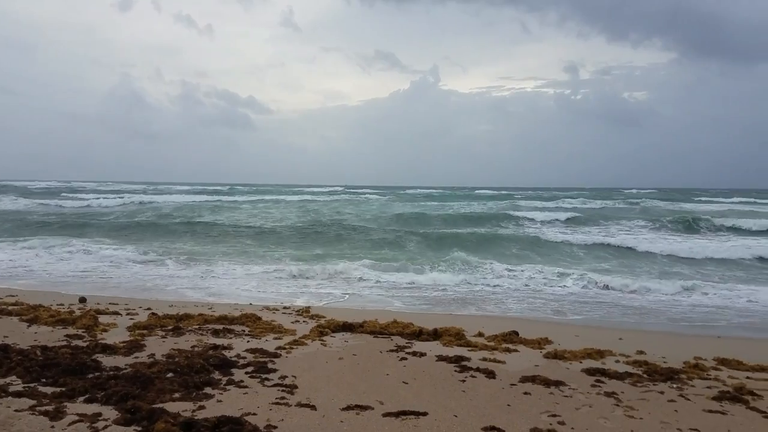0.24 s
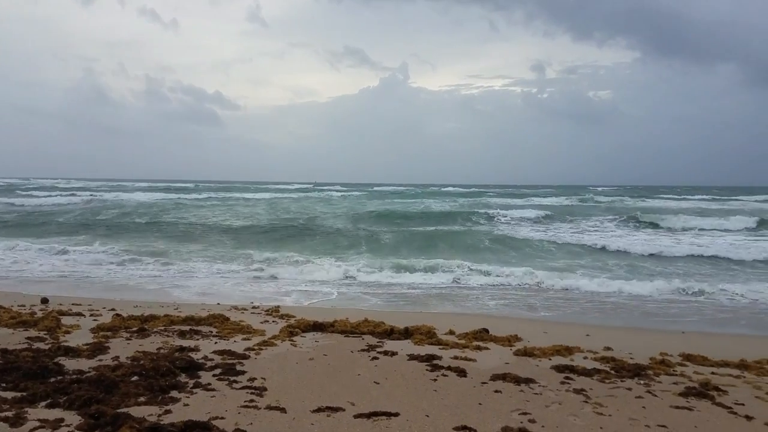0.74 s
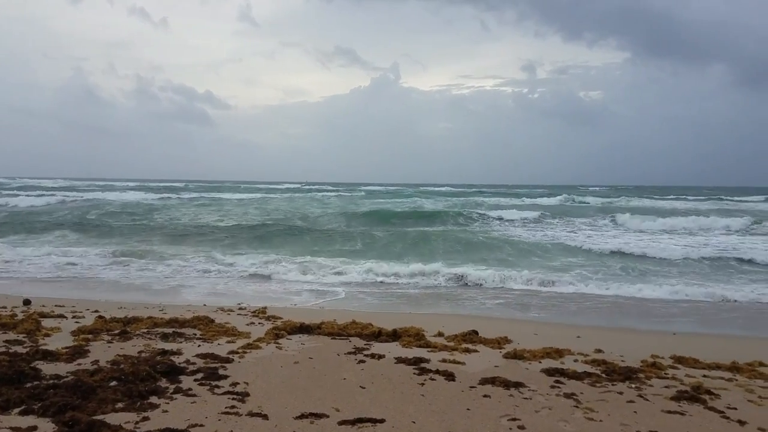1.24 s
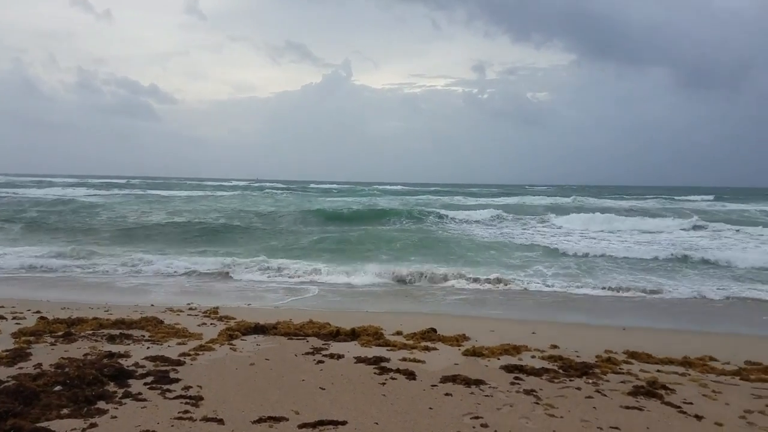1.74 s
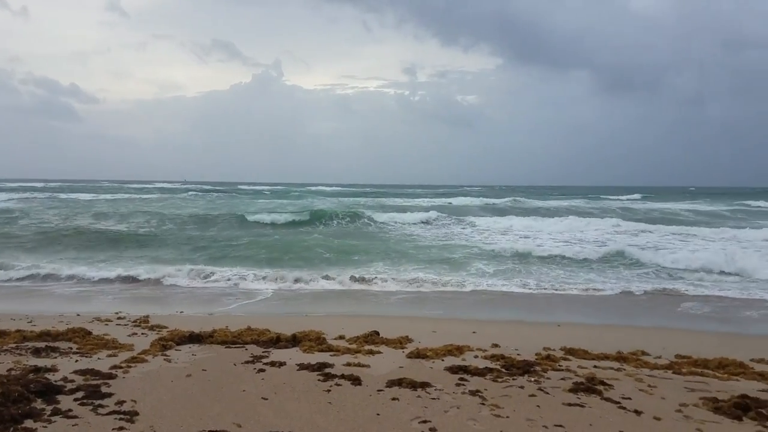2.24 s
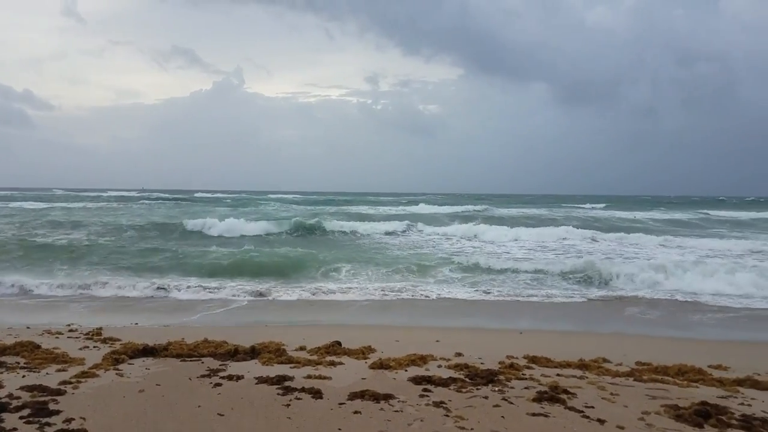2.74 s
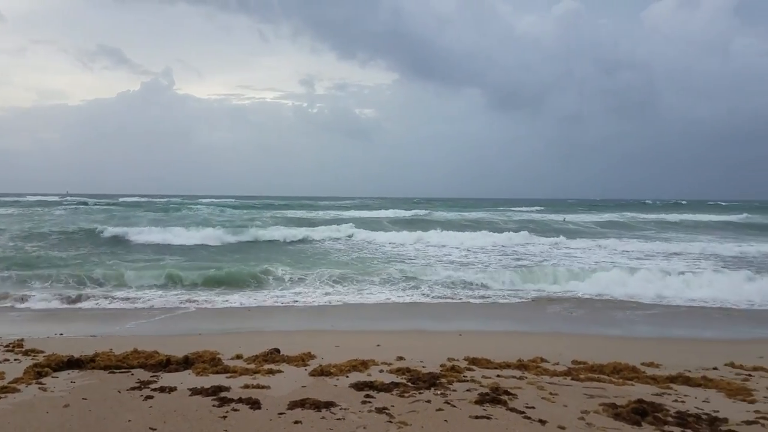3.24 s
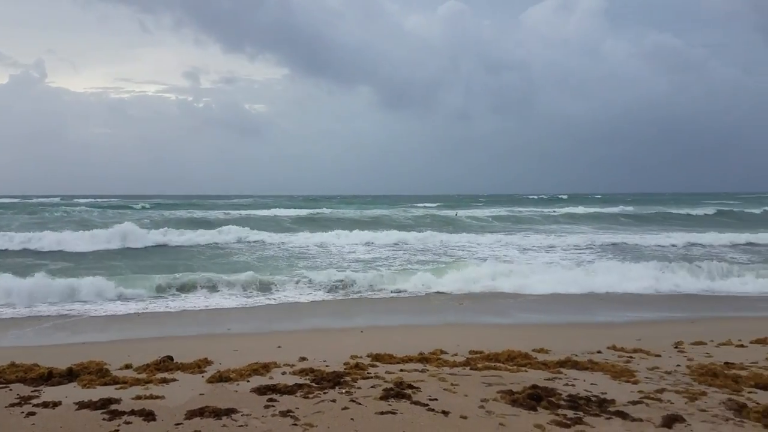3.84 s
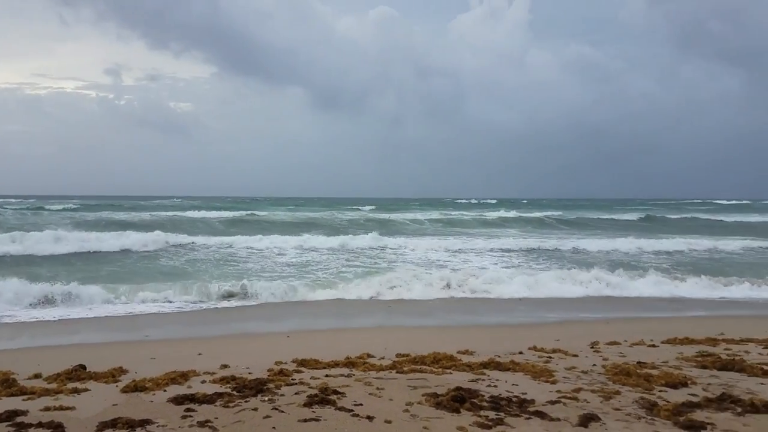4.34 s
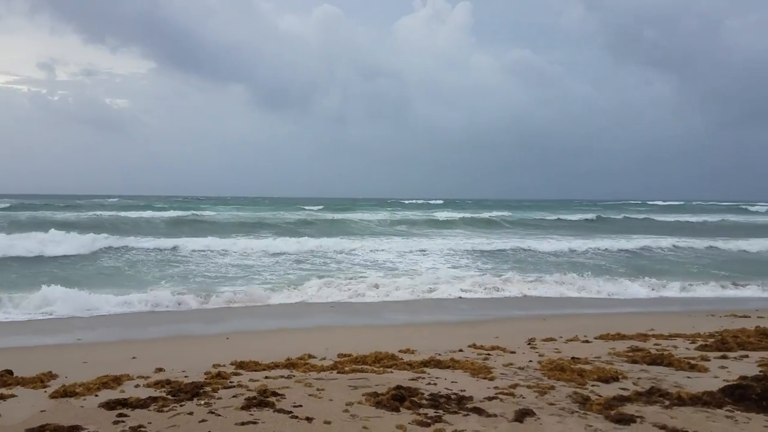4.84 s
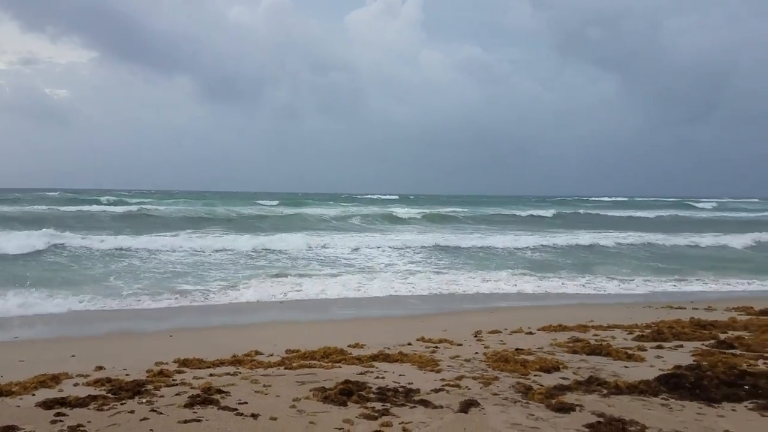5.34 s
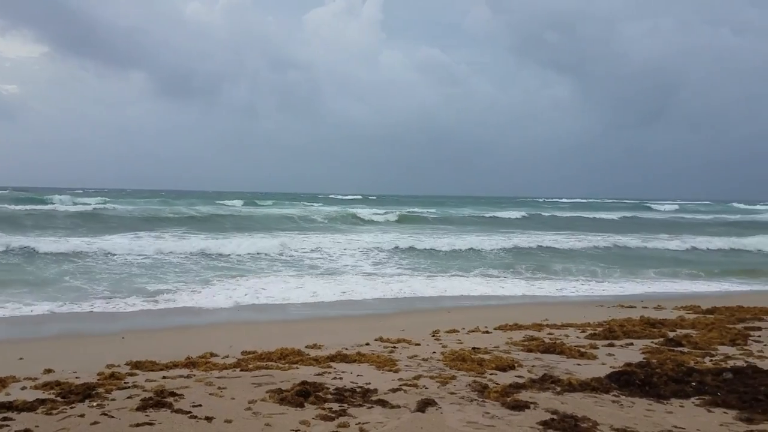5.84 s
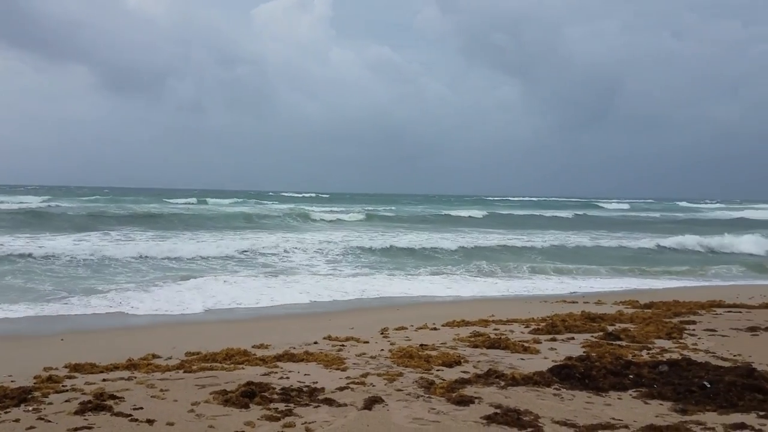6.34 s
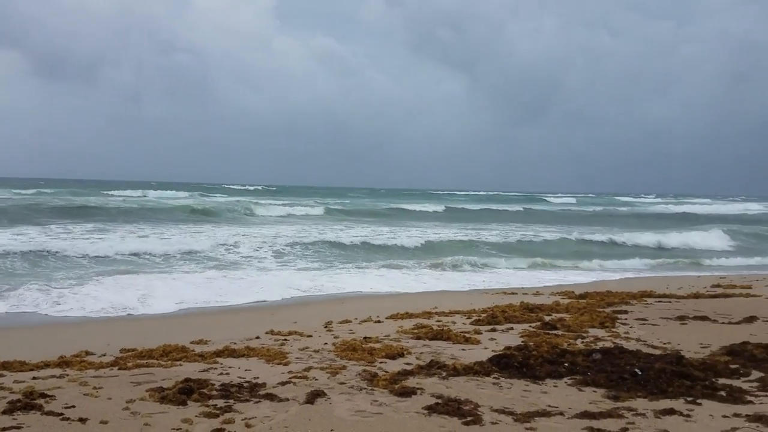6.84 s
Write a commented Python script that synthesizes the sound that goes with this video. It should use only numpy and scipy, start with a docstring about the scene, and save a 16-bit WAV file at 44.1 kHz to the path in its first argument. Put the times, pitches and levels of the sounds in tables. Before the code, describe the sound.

Outdoors on a windy beach, storm air beats directly on a hand-held stereo microphone. From 0 to 2 s a rough, continuous roar fills the right side while the left carries softer, lumpy rumble with gust thumps near 0.1, 0.9 and 1.2 s; thin surf hiss drifts underneath. From 2 s faint tones stutter in the left, with another gust around 2.3 s. From 3.1 s short high chirping whistles appear at left, jumping in pitch; a wavering high whistle holds from about 3.8 to 4.4 s, then a lower, stronger one until 5.2 s. The wind becomes hollow from 5.1 s and sinks on the right near 5.5 to 5.9 s. Lower, breathy whistles sound on both sides from 5.7 to 6.2 s, in broken bursts. Surf hiss has swelled by 6.2 s; buffeting surges around 6.4 s, and hard rapid slaps crowd the left from 6.5 to 6.8 s, with the right choppy until the end at 7 s.

```python
"""Storm wind on a beach buffets the two microphone ports of a hand-held camera: noise, shaped at each port.
Foam hisses beneath it throughout as drifting noise. From 2 s the left port stutters between two tones,
and from 3.1 to 6.2 s the air jet across its hole whistles, as wobbling sines that jump between stages.
From 5.1 s the wind turns hollow; from 5.7 s the right port whistles breathily, as a band of noise.
At 6.2 s the surf has swelled, and from 6.5 s hard slaps of air crowd the left port."""
import sys
import numpy as np
from scipy import signal
from scipy.io import wavfile
from scipy.ndimage import uniform_filter1d

SR = 44100
rng = np.random.default_rng(int(sys.argv[2]) if len(sys.argv) > 2 else 0)


def generate_wav(sig):
    """Save sig (samples, or channels by samples) to the path in sys.argv[1] as 16-bit PCM at SR."""
    pcm = np.round(np.clip(np.atleast_2d(sig).T, -1, 1) * 32767).astype(np.int16)
    wavfile.write(sys.argv[1], SR, pcm)


N = 312669
FRAME, HOP = 512, 128  # short-time spectrum, samples


def gain_of(db):
    """Level law: 20 dB is a factor of ten in pressure."""
    return 10 ** (np.asarray(db) / 20)


def evened(x):
    """Normalisation to an rms of 1."""
    return x / np.sqrt(np.mean(x ** 2) + 1e-20)


def read(points, hz):
    """Spectrum in dB, interpolated along logarithmic frequency."""
    point_hz, value = np.transpose(points)
    return np.interp(np.log(hz + 1), np.log(point_hz + 1), value)


def lobe(hz, centre_hz):
    """Flat-topped band weight, symmetric in logarithmic frequency."""
    return 1 / (1 + (np.log(hz / centre_hz + 1e-9) / .5) ** 4)


def pulses(rows, width_s):
    """Gaussian pulses summed in dB, each down to 1/e of its peak at width_s either side."""
    clock = np.arange(N) / SR
    return np.zeros(N) + sum(db * np.exp(-((clock - at) / width_s) ** 2) for at, db in rows)


def add(mix, s, sound):
    """Superposition: pressures add from s seconds on."""
    part = mix[round(s * SR):][:len(sound)]
    part += sound[:len(part)]


def wander(length, hz):
    """Low-passed random fluctuation of rms 1, with a double pole at hz."""
    pole = np.exp(-2 * np.pi * hz / SR)
    noise = rng.standard_normal(length)
    return evened(signal.lfilter([1], np.poly([pole, pole]), noise))


def shaped(x, field_db):
    """Time-varying filtering: a level field over (s, Hz) weights the short-time spectrum."""
    hz, t, spectrum = signal.stft(x, SR, nperseg=FRAME, noverlap=FRAME - HOP)
    spectrum = spectrum * gain_of(field_db(t[None], hz[:, None]))
    return signal.istft(spectrum, SR, nperseg=FRAME, noverlap=FRAME - HOP)[1][:N]


# Buffeting of each port above the rumble. Each row: time in seconds, level in dB.
LEFT_BUFFETING = [(0.0, -26.5), (0.5, -21), (0.75, -26), (1.12, -25.5), (1.33, -30.5), (1.56, -24.5),
                  (1.9, -28), (2.55, -27), (2.85, -28.5), (3.5, -28.5), (3.6, -34), (3.83, -37),
                  (3.92, -31.5), (4.26, -28.5), (4.87, -34), (5.23, -30), (5.8, -35), (5.94, -25.5),
                  (6.26, -23), (6.39, -18.5), (7.08, -23)]
RIGHT_BUFFETING = [(0.0, -13.5), (0.13, -11), (.5, -11), (0.76, -8.5), (0.95, -16.5), (1.05, -12),
                   (1.33, -11), (1.7, -13.5), (2.13, -11), (2.73, -11), (2.87, -14), (3.15, -11.5),
                   (5.27, -12.5), (5.5, -22), (5.7, -24.5), (5.83, -30), (5.94, -18), (6.13, -18.5),
                   (6.38, -9), (6.59, -11.5), (6.695, -18.5), (6.73, -11.5), (6.775, -22), (6.81, -12.5),
                   (6.91, -20), (7.08, -18.5)]
# Relative eddy pressure spectrum at air speed 1. Each row: frequency in Hz, density in dB.
LEFT_EDDY_SPECTRUM = [(120, -3), (250, -4), (700, -15), (1000, -26), (2000, -32.5), (4000, -64),
                      (8000, -86)]
RIGHT_EDDY_SPECTRUM = [(120, 0), (700, 1), (1000, -4), (1400, -10), (2000, -13.5), (4000, -33),
                       (6000, -50.5), (9000, -71)]
# How the air meets the ports. Each row: time in seconds, left speed factor, left rumble in dB,
# right speed factor, right rumble in dB.
AIR_FLOW = [(0.0, 0.64, -3, 0.94, 5), (0.74, 1.18, 2, 1.09, -5), (0.96, 0.72, 1, 1.03, 5),
            (1.34, 1.16, 7.5, 1.14, -8), (1.66, 0.89, 2, 1.03, 3), (1.92, 0.88, 6, 0.97, -9.5),
            (2.37, 1.22, 11, 0.9, 0), (3.43, 0.63, 1, 0.92, 0.5), (3.73, 1.5, 14, 0.9, -0.5),
            (4.0, 0.79, 9.5, 0.74, 2), (4.72, 0.81, 10.5, 0.99, 12), (5.03, 0.42, 3, 1.04, 5.5),
            (5.7, 1.5, 7, 0.75, 0), (5.97, 1, -3.5, 0.79, 3), (7.08, 1.03, -2, 0.65, 3)]
# Short hard slaps on the left port. Each row: time in seconds, strength in dB before the shares below.
AIR_SLAPS = [(1.206, 5), (2.02, 8), (2.265, 5), (2.35, 6), (3.5, 13), (5.775, 8), (6.57, 14.5), (6.607, 8),
             (6.655, 9), (6.718, 10.5), (6.748, 7), (6.795, 10), (6.822, 10)]
# Longer gusts on the left port. Each row: time in seconds, lift in dB above the buffeting.
LONG_GUSTS = [(.085, 11.5), (.93, 6), (1.24, 9.5), (2.0, 6.5), (2.31, 7.5), (3.07, 5.5), (6.97, 3.5)]
# Hollow roar as the camera turns. Each row: time in seconds, lift in dB before the spectrum is evened.
HOLLOW_ROAR = [(5.1, -1), (5.6, 4)]
SLAP_S, GUST_S = 0.012, 0.066  # pulse half-widths
SLAP_LEVEL, BITE, BITE_HZ = .6, 1.05, 1510  # shares of a slap's dB: overall, and extra in one band
HOLLOW_HZ, RUMBLE_HZ = 500, 150


def buffeting(rows, column, eddies, slaps, gusts, spiky, lump_db, lump_hz, sharpen):
    """Turbulent pressure: uneven eddies strike in lumps; faster air stretches their spectrum upward."""
    s, speed, rumble_db = np.transpose(AIR_FLOW)[[0, column, column + 1]]
    clock = np.arange(N) / SR
    strikes = np.exp(spiky * rng.standard_normal(N))  # many small pushes, a few large ones
    lumps_db = lump_db * wander(N, lump_hz)
    stretch = np.exp(sharpen * lumps_db)  # harder lumps sound brighter
    slaps_db = pulses(slaps, SLAP_S)
    gusts_db = pulses(gusts, GUST_S)

    def field_db(t, hz):
        speed_now = np.interp(t, s, speed) * np.interp(t, clock, stretch)
        db = read(eddies, hz / speed_now)
        db = db + np.interp(t, *np.transpose(HOLLOW_ROAR)) * lobe(hz, HOLLOW_HZ)
        # equal mean power above the rumble at every moment
        db = db - 10 * np.log10(np.mean(gain_of(2 * db) * (hz > RUMBLE_HZ), axis=0))
        db = db + BITE * np.interp(t, clock, slaps_db) * lobe(hz, BITE_HZ)
        return db + np.interp(t, s, rumble_db) / (1 + (hz / RUMBLE_HZ) ** 4)

    level_db = np.interp(clock, *np.transpose(rows)) + lumps_db + SLAP_LEVEL * slaps_db + gusts_db
    level = gain_of(level_db)
    return level * shaped(evened(strikes - strikes.mean()), field_db), level


def rush(level):
    """Broadband flow noise: a thin hiss through the right hole, in proportion to the buffeting."""
    band = signal.butter(6, [3500, 8700], "bandpass", fs=SR, output="sos")
    hiss = evened(signal.sosfilt(band, rng.standard_normal(N)))
    return gain_of(-39.0) * level * hiss


# Whistles of the left hole. Each row: start in seconds, end in seconds, pitch in Hz at jet speed 1,
# starting level in dB, swell in dB by its end, level of the octave in dB, wobble as a share of pitch.
HOLE_WHISTLES = [(3.096, 3.13, 3080, -33, -3, -35, .012), (3.133, 3.232, 2900, -38, 2, -35, 0.013),
                 (3.177, 3.292, 2240, -48, 5, -35, 0.013), (3.252, 3.28, 3050, -36, -1.5, -35, .01),
                 (3.356, 3.426, 3050, -32.5, -3, -35, 0.012), (3.447, 3.486, 2050, -33, 13, -35, .006),
                 (3.493, 3.529, 3790, -36.5, 5, -35, .01), (3.555, 3.626, 2400, -36, 1, -35, .01),
                 (3.61, 3.791, 2414, -26.5, 3, -19, 0.0049), (3.688, 3.725, 3200, -36, -2, -35, .01),
                 (3.767, 4.358, 3120, -25, 4, -32, 0.014), (4.355, 5.205, 1994, -18, 0.5, -22, 0.0172),
                 (5.2, 5.238, 1870, -32, -8, -30, 0.017), (5.59, 5.677, 1430, -45, 0, -30, .03),
                 (5.714, 5.88, 1492, -33.5, 10, -24, .02), (5.886, 5.926, 1504, -21.5, 0, -18, .015),
                 (5.936, 5.97, 1477, -27, 1.5, -26, .015), (5.958, 5.982, 1510, -19.5, 0, -19, .015),
                 (6.118, 6.207, 1498, -17.5, 3.5, -23, 0.014)]
# Speed of the air jet, which bends every whistle. Each row: time in seconds, speed factor.
JET_SPEED = [(3.445, 1), (3.468, 0.98), (3.478, .97), (3.49, 1.02), (3.606, 1.1), (3.617, 0.93),
             (3.645, 1.07), (3.7, 1.031), (3.772, 1.01), (3.793, 1.08), (3.835, 1.01), (3.905, 1.015),
             (3.95, 1.09), (4.024, 0.98), (4.06, 1.004), (4.17, 0.9), (4.244, 0.97), (4.295, 0.86),
             (4.345, 0.94), (4.375, 0.92), (4.4, 0.9), (4.418, .84), (4.455, 0.98), (4.485, 0.86),
             (4.584, 1.04), (4.66, .99), (4.688, 1.03), (4.72, 0.86), (4.774, 1.036), (4.914, 0.95),
             (4.949, 1.04), (4.979, 0.87), (5.058, 1), (5.073, 1.01), (5.123, 0.89), (5.19, .84),
             (5.23, .75), (5.6, 1), (5.715, 0.91), (5.74, 1.12), (5.76, 0.93), (5.772, 1.16), (5.787, 1.1),
             (5.822, .95), (5.845, 0.97), (5.875, 0.92), (5.905, 1.025), (5.975, 0.93), (6.118, 1.08),
             (6.135, 1.03), (6.155, 1.045), (6.195, 0.98)]
CATCH_S, DROP_S = 0.003, 0.0144  # onset and release
DROOP = 0.21  # share of its pitch that a whistle sags as it drops out


def whistle(s, end, hz, db, swell_db, octave_db, wobble):
    """Edge tone: the jet flips across the hole's edge, a near sine with a weak octave."""
    length = end - s
    t = np.arange(0, length, 1 / SR)
    catch = np.minimum(t / CATCH_S, 1)
    hold = np.minimum((length - t) / DROP_S, 1)
    pitch = hz * np.interp(s + t, *np.transpose(JET_SPEED)) * (1 - DROOP * (1 - hold) ** 2)
    quick, slow, reedy, flutter, hoarse = (wander(SR, rate)[:len(t)] for rate in (157, 60, 30, 99, 260))
    wobbling_pitch = pitch * (1 + wobble * (quick + 0.727 * slow))
    phase = 2 * np.pi * np.cumsum(wobbling_pitch) / SR
    octave = gain_of(octave_db + 2.9 * reedy) * np.sin(2 * phase)
    tone = np.sin(phase) + octave
    tone = tone * (1 + 0.12 * hoarse)  # a skirt of rough air around the tone
    level = np.sqrt(2) * gain_of(db + swell_db * t / length + 1.34 * flutter)
    return s, level * catch * hold * tone


# Stuttering of the left jet before it locks. Each row: start in seconds, length in seconds, level in dB.
JET_STUTTERS = [(2, 0.74, -43), (2.95, 0.74, -38)]


def ring(x, hz, sharpness):
    """Resonance, applied twice for steeper skirts."""
    b, a = signal.iirpeak(hz, sharpness, SR)
    return evened(signal.lfilter(b, a, signal.lfilter(b, a, x)))


def stutter(s, length, db):
    """Intermittent edge tones: two wavering pitches catch and drop at random in a patch of rough hiss."""
    hiss = ring(rng.standard_normal(SR), 2300, 3.5)
    flickers = gain_of(1 + 4.7 * wander(SR, 30)) * hiss
    for hz in (2170, 3100):
        phase = 2 * np.pi * np.cumsum(hz * (1 + 0.028 * wander(SR, 18.2))) / SR
        catches = np.clip(wander(SR, 35), 0, 2)
        flickers += np.sin(phase) * catches
    part = evened(flickers[:round(length * SR)])
    return s, gain_of(db) * part * signal.windows.tukey(len(part), .45)


# Breathy whistles of the right hole. Each row: start in seconds, length in seconds, level in dB.
BREATHY_WHISTLES = [(5.733, 0.093, -31), (5.811, 0.2, -26.5), (6.114, .1, -20.5)]
BREATHY_HZ, SWAY_HZ = 1474, 190  # pitch at jet speed 1; pole of the random sway that widens it


def breathy(s, length, db):
    """Narrowband noise: a jet too rough to lock sways at random about its pitch and a weak octave."""
    t = np.arange(0, length, 1 / SR)
    pitch = BREATHY_HZ * np.interp(s + t, *np.transpose(JET_SPEED))
    phase = 2 * np.pi * np.cumsum(pitch) / SR
    sway = (wander(SR, SWAY_HZ) + 1j * wander(SR, SWAY_HZ))[:len(t)]
    carrier = np.exp(1j * phase) + gain_of(-18.0) * np.exp(2j * phase)
    tone = (sway * carrier).real
    return s, gain_of(db) * evened(tone) * signal.windows.tukey(len(t), .35)


# Swell of the surf. Each row: time in seconds, left level in dB, right level in dB, both before colour.
SURF_SWELL = [(0.0, -62, -60), (0.81, -65, -58.5), (1.98, -59, -56.5), (2.26, -62.5, -60.5),
              (4.2, -55, -53), (5.36, -56.5, -53.5), (5.71, -57, -59), (5.82, -56.5, -55), (6.19, -49, -49),
              (7.08, -49.5, -50.5)]
# Colour of the surf at each port. Each row: frequency in Hz, relative density in dB.
SURF_COLOUR_LEFT = [(1000, 26.2), (4000, 8.8), (7000, 1.3), (10000, 3), (14000, 6.9)]
SURF_COLOUR_RIGHT = [(1000, 34.6), (4000, 13.2), (8300, 1.7), (10000, 0.76), (14000, 4.2)]


def surf(column, colour):
    """Incoherent sum of foam: broad hiss in drifting patches, swelling as a wave runs up the sand."""
    clock = np.arange(N) / SR
    s, level_db = np.transpose(SURF_SWELL)[[0, column]]
    swell_db = .9 * wander(N, 9.5) + np.interp(clock, s, level_db)

    def field_db(t, hz):
        patches = rng.standard_normal((hz.size, t.size))
        patches = uniform_filter1d(patches, 8, axis=0)  # across frequency
        patches = evened(uniform_filter1d(patches, 20, axis=1))  # across time
        return read(colour, hz) + 2.5 * patches + np.interp(t, clock, swell_db)

    return shaped(rng.standard_normal(N), field_db)


def scene():
    """Superposition at two ports, each with turbulence of its own."""
    left, _ = buffeting(LEFT_BUFFETING, column=1, eddies=LEFT_EDDY_SPECTRUM, slaps=AIR_SLAPS,
                        gusts=LONG_GUSTS, spiky=0.78, lump_db=3.0, lump_hz=35.4, sharpen=0.03)
    right, level = buffeting(RIGHT_BUFFETING, column=3, eddies=RIGHT_EDDY_SPECTRUM, slaps=[],
                             gusts=[], spiky=0.54, lump_db=1.33, lump_hz=27.2, sharpen=0.036)
    right += rush(level)
    for row in HOLE_WHISTLES:
        add(left, *whistle(*row))
    for row in JET_STUTTERS:
        add(left, *stutter(*row))
    for row in BREATHY_WHISTLES:
        add(right, *breathy(*row))
    left += surf(column=1, colour=SURF_COLOUR_LEFT)
    right += surf(column=2, colour=SURF_COLOUR_RIGHT)
    return np.array([left, right])


def record(dry):
    """Microphone response: deep bass lost, highest peaks softly saturated, then a steep band limit."""
    thin = signal.sosfilt(signal.butter(2, 75, "highpass", fs=SR, output="sos"), dry)
    rounded = thin / (1 + abs(thin) ** 4) ** (1 / 4)
    band_limit = signal.firwin(1023, 15750, window=("kaiser", 11), fs=SR)  # edge in Hz
    return signal.oaconvolve(rounded, band_limit[None], "same", axes=1)


dry = scene()
out = record(dry)
generate_wav(out)
```